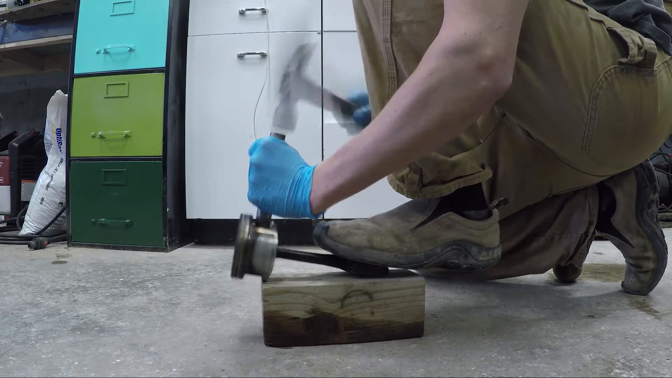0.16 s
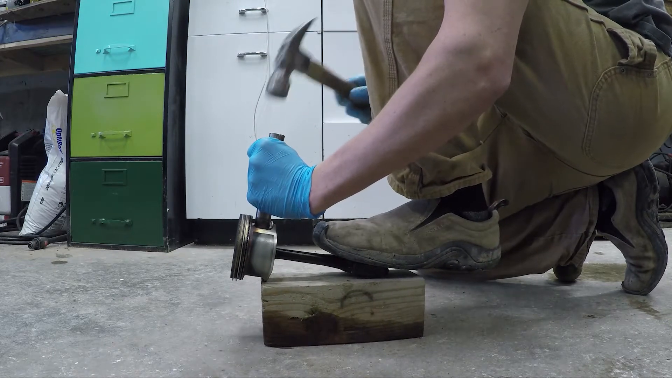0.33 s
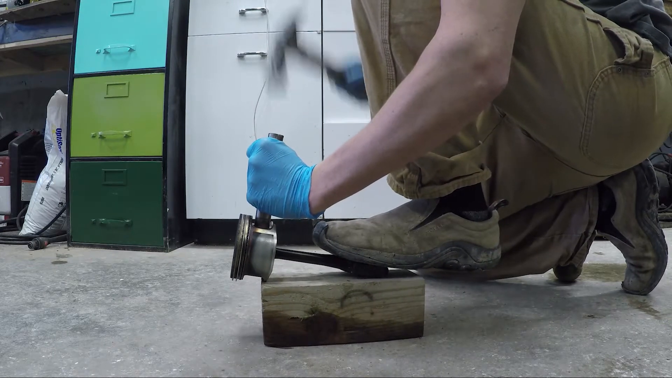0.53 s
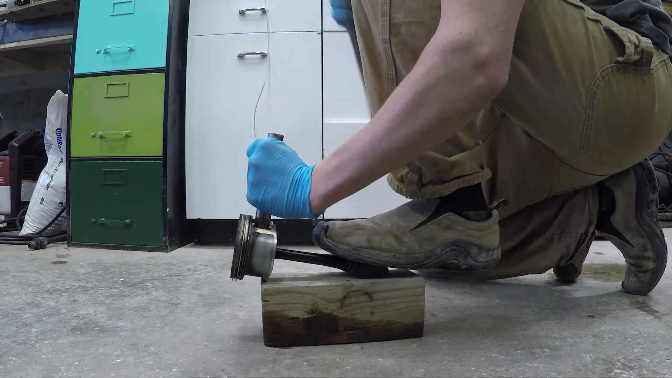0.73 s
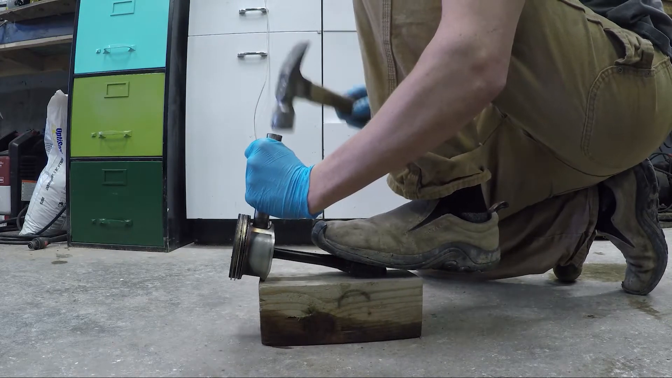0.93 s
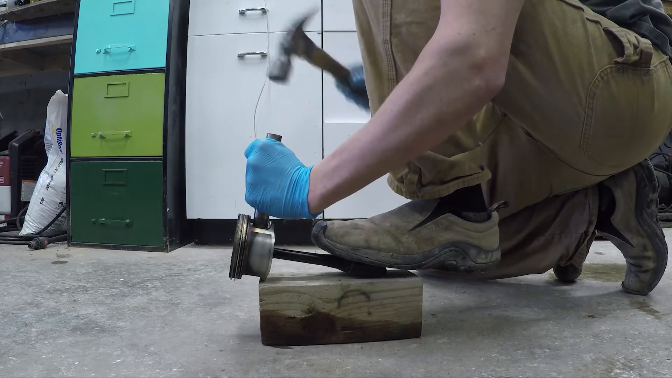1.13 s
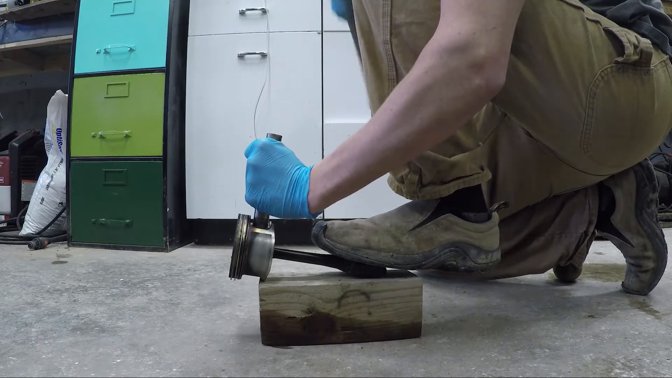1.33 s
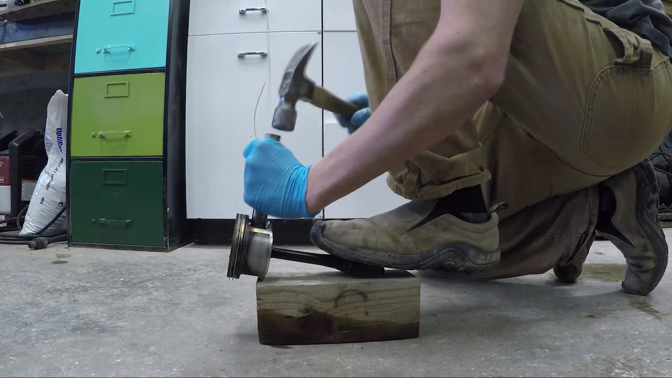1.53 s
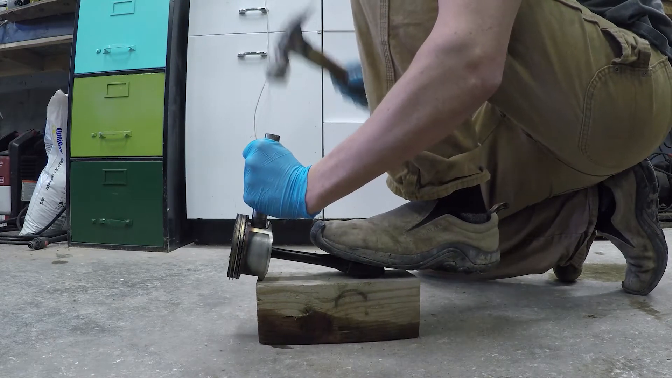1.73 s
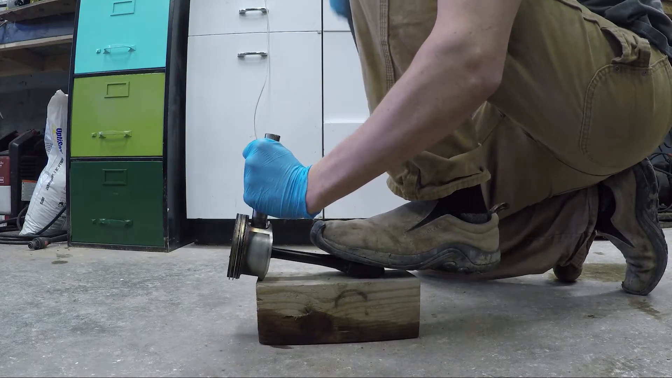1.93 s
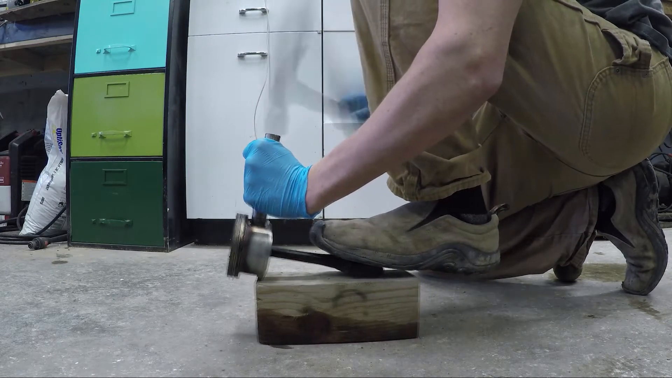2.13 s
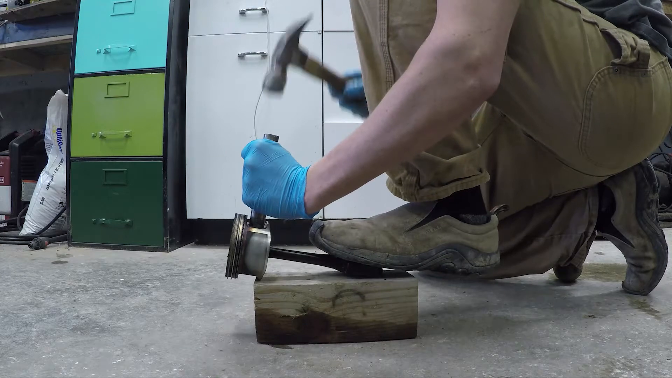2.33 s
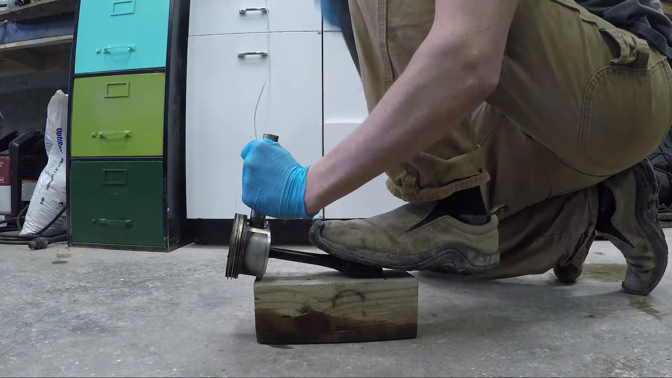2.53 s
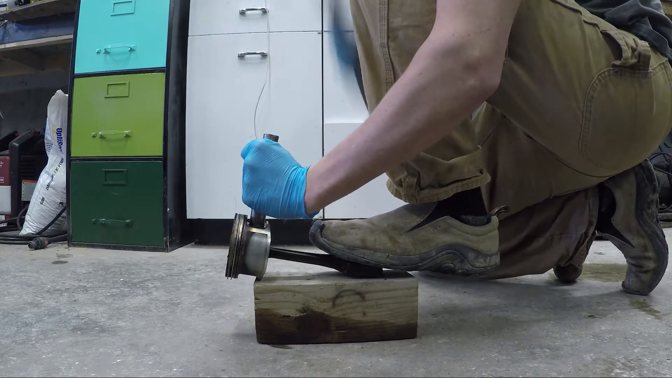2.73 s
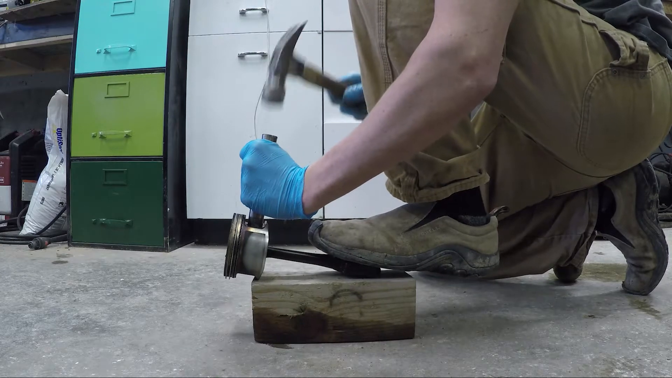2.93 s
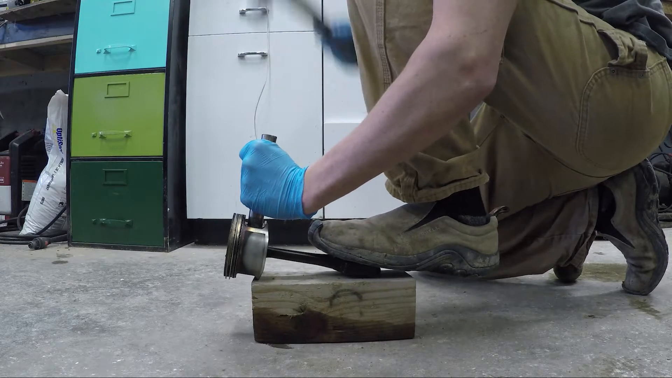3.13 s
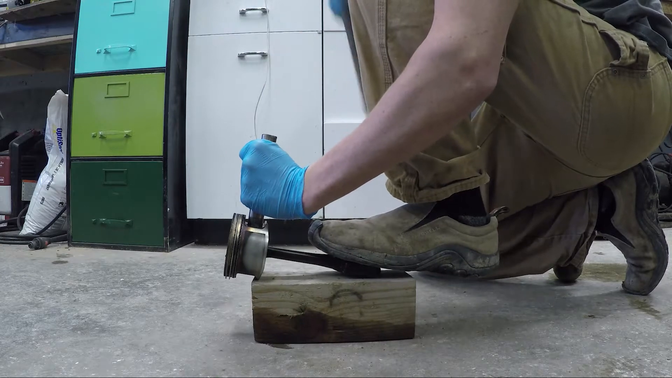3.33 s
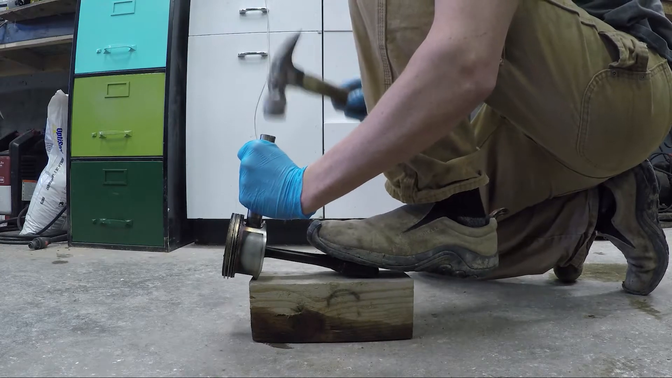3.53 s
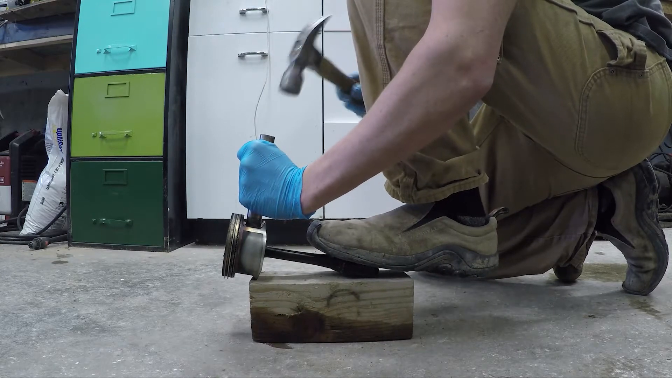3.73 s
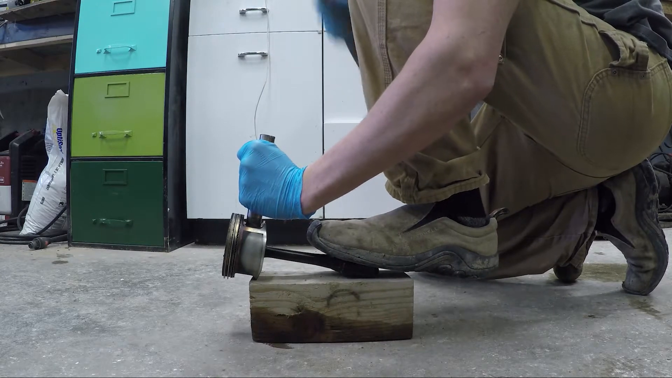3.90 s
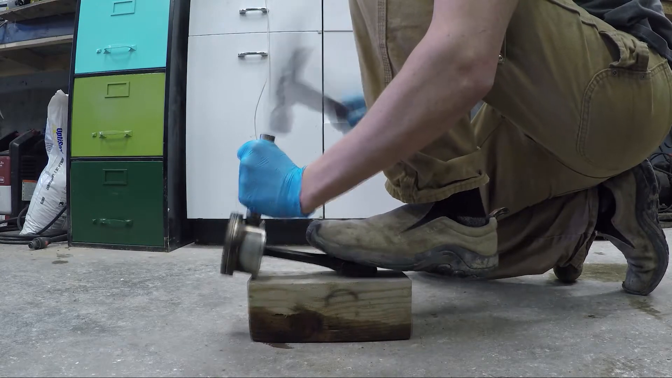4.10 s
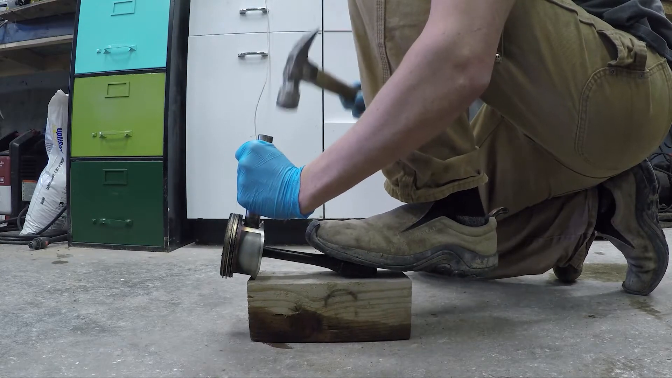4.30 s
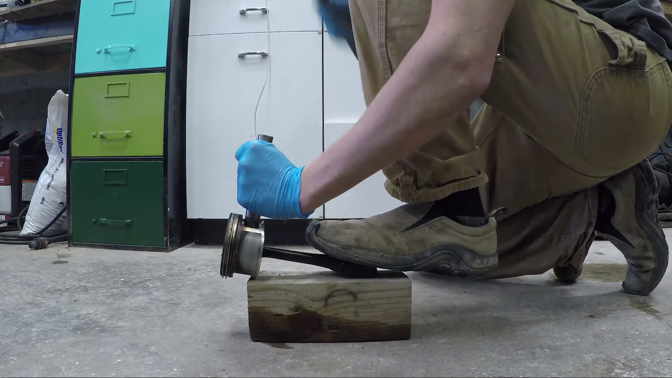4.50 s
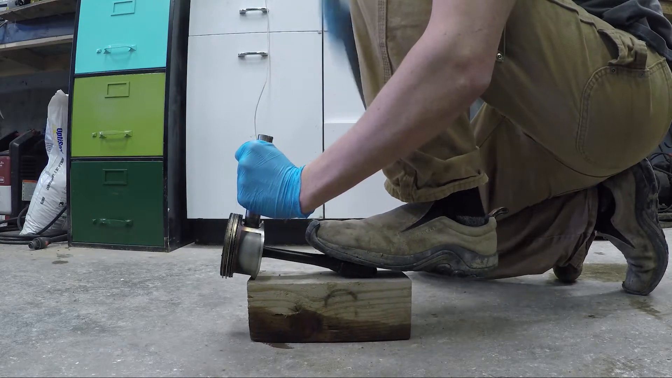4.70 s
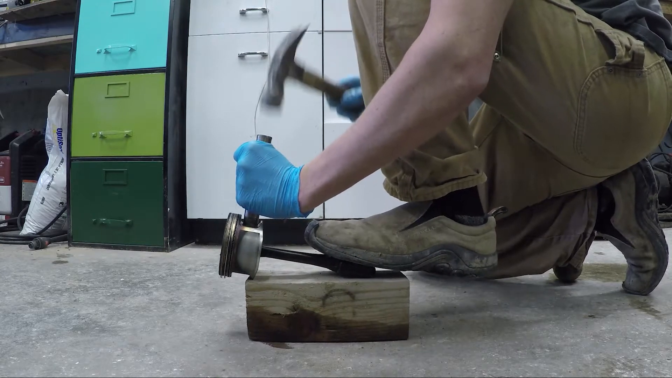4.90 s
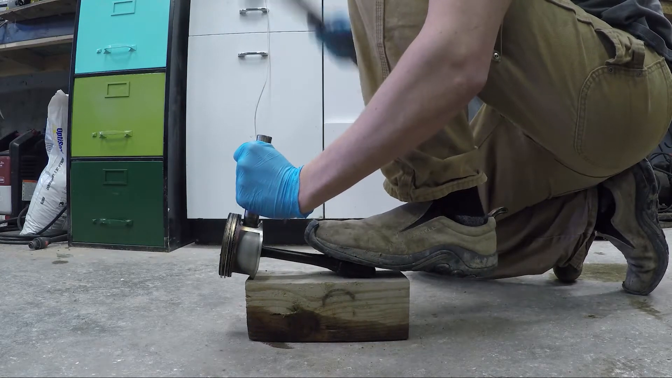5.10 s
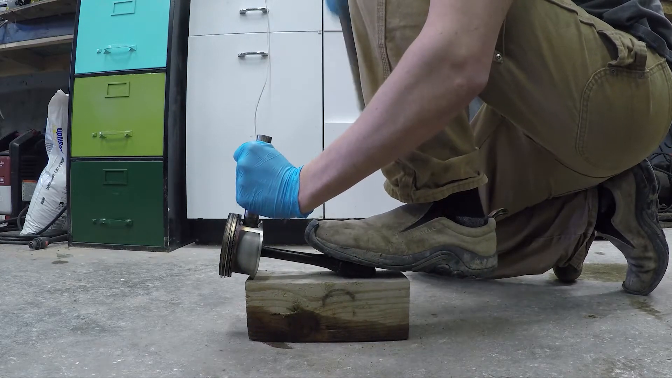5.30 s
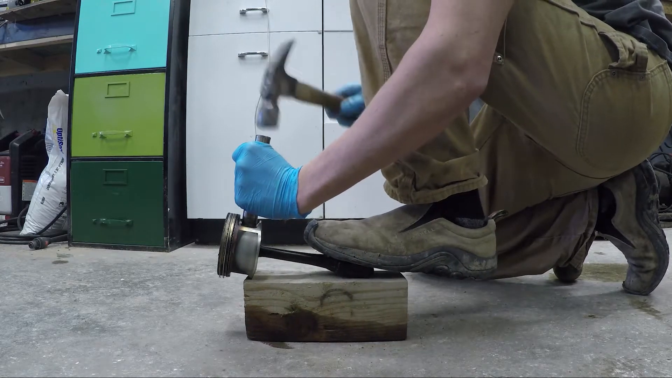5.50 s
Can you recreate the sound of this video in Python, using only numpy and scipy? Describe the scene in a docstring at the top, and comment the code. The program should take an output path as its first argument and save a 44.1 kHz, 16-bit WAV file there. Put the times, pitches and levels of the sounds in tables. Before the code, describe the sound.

A hammer strikes a steel punch in nine evenly paced blows, each a sharp clank and thump ringing briefly in a workshop.

```python
"""A workshop rings from a blow just struck; then come nine evenly paced hammer blows, steel on steel.
The hammer drives a punch into the pin of a piston that lies on a wood block on a concrete floor.
Each blow is a crack, a short clank and a deep thump; the room and its steel cabinets ring on.
The piston's ring changes colour as the pin travels. The close microphone overloads on each crack."""
import sys
import numpy as np
from scipy import signal
from scipy.fft import rfft, irfft, next_fast_len
from scipy.io import wavfile
from scipy.ndimage import uniform_filter1d

SR = 44100
rng = np.random.default_rng(int(sys.argv[2]) if len(sys.argv) > 2 else 0)


def put_to_file(sound):
    """Save the sound as 16-bit audio at rate SR, in the file named by the first command-line argument."""
    columns = np.atleast_2d(sound).T  # one column per channel
    safe = np.clip(columns, -1, 1)
    whole_steps = np.round(safe * 32767)
    wavfile.write(sys.argv[1], SR, whole_steps.astype(np.int16))


N = 244931
TAIL = np.arange(int(1.3 * SR)) / SR   # seconds since a hit

# decay time of the workshop's reverb: f/Hz, t60/s
ROOM_DECAY = [(60, 0.72), (160, 1.51), (450, 1.16), (1200, 1.193), (2200, 0.88), (4000, 0.88), (6500, 0.6),
              (9000, 0.43), (15000, 0.16)]


def from_db(db):
    """Decibels to gain."""
    return 10 ** (np.asarray(db) / 20)


def unit_rms(x):
    """Scale to unit power."""
    return x / np.sqrt(np.mean(x ** 2) + 1e-20)


def at_hz(curve, hz):
    """Read a curve on a log-frequency axis."""
    freqs, values = np.transpose(curve)
    return np.interp(np.log(np.maximum(hz, 1)), np.log(freqs), values)


def add(out, start_s, sound):
    """Mix a sound in; a negative start leaves only its tail."""
    at = round(start_s * SR)
    part = sound[max(-at, 0):N - at]
    out[max(at, 0):max(at, 0) + len(part)] += part


def attack(rise_s):
    """Envelope that rises from 0 towards 1."""
    return 1 - np.exp(-TAIL / rise_s)


def decay(t60):
    """Envelope that falls 60 dB in t60 seconds."""
    return from_db(-60 * np.minimum(TAIL / t60, 5))


def noise(spectrum, size):
    """Coloured noise of unit power."""
    n = next_fast_len(size)
    colour = from_db(at_hz(spectrum, np.fft.rfftfreq(n, 1 / SR)))
    return unit_rms(irfft(rfft(rng.standard_normal(n)) * colour, n)[:size])


def band(low_hz, high_hz, x):
    """Band-pass with unity gain at its centre."""
    sos = signal.butter(2, [low_hz, min(high_hz, .45 * SR)], "band", fs=SR, output="sos")
    return signal.sosfilt(sos, x)


def ringing(modes):
    """One decaying sine per mode, as rows."""
    return np.array([from_db(db) * np.sin(2 * np.pi * hz * TAIL) * decay(t60) for hz, db, t60 in modes])


def room_tone(level_db=-54):
    """The faint, steady rumble of the workshop."""
    # spectrum of the rumble: f/Hz, level/dB
    rumble = [(25, 3.5), (50, 9.5), (130, 6.5), (300, -14), (600, -21), (1200, -23), (3000, -36.5),
              (8000, -38.5), (15000, -40)]
    return from_db(level_db) * noise(rumble, N)


def reflections():
    """Diffuse echoes as third-octave noise bands, each dying at its own rate: centres and waveforms."""
    # colour of the reverb: f/Hz, level/dB
    colour = [(40, 5), (80, 8.5), (125, 6.5), (200, 0.5), (310, -2), (410, -10.5), (520, -1), (900, -1),
              (1400, 3.5), (2100, -0.5), (3600, 0), (6400, -5), (7800, -14), (11000, -14), (15000, -15.5)]
    edges = np.geomspace(28, 17000, 29)
    centres = np.sqrt(edges[1:] * edges[:-1])
    white = rng.standard_normal((2, len(TAIL)))
    bands = []
    for k, hz in enumerate(centres):
        wash = band(edges[k], edges[k + 1], white[k % 2])
        bands.append(wash * from_db(at_hz(colour, hz)) * decay(at_hz(ROOM_DECAY, hz)))
    return centres, np.array(bands)


def reverb(fixed_paths, bass_db=0, tilt_db=0, level_db=-15, alike=0.58, bass_hz=400, pivot_hz=2500):
    """The reverb of one hit: partly the same every time, partly new as the tools shift."""
    hz, fresh_paths = reflections()
    paths = np.sqrt(alike) * fixed_paths + np.sqrt(1 - alike) * fresh_paths
    low_shelf = bass_db / (1 + (hz / bass_hz) ** 2)
    treble_tilt = tilt_db * np.log2(np.maximum(hz / pivot_hz, 1))
    return from_db(level_db + low_shelf + treble_tilt) @ paths * attack(0.0067)


def workshop_ring(level_db=-1, spread_db=2.5):
    """A blow sets the room and its steel cabinets ringing, in a new balance each time."""
    # standing waves and cabinet panels: f/Hz, level/dB, t60/s
    modes = [(101.3, -33, 0.5), (111.6, -29, 0.69), (131.8, -36.5, 0.46), (160.5, -33.5, 0.72),
             (192, -32, 1), (285.4, -33.5, .6), (773, -40.5, 1.2), (890, -48, 1.8), (1115, -35.5, 0.75),
             (1177, -42, .9), (1213, -37, 0.98), (1253, -35, 1.4), (1424, -39.5, 0.88)]
    gains = from_db(level_db + spread_db * rng.standard_normal(len(modes)))
    return gains @ ringing(modes) * attack(0.0025)


def piston_ring(travel, level_db=2.5, spread_db=1.5, close_db=10):
    """Partials set by the pin's travel: briefly close, then lingering in the room as wavering bands."""
    # piston partials: f/Hz, width/Hz, level/dB at the start of the travel, level/dB at its end
    partials = [(871, 75, -37, -43.5), (1164, 150, -46.5, -35), (1323, 170, -35, -30),
                (1590, 410, -28.5, -44), (2423, 100, -42, -32.5), (2548, 120, -37.5, -36),
                (3310, 460, -43.5, -30.5), (4004, 410, -27, -44), (5130, 130, -30, -33),
                (5560, 270, -39.5, -40.5), (6080, 97, -34.5, -50.5), (6530, 130, -43.5, -32),
                (6710, 470, -45.5, -30), (8980, 220, -58, -38.5), (9480, 240, -42, -39)]
    close = from_db(close_db) * decay(0.035)
    out = 0
    for hz, width, start_db, end_db in partials:
        db = start_db + (end_db - start_db) * travel + spread_db * rng.standard_normal()
        tone = unit_rms(band(hz - width / 2, hz + width / 2, rng.standard_normal(len(TAIL))))
        lingering = decay(0.99 * at_hz(ROOM_DECAY, hz))
        out = out + from_db(level_db + db) * (close + lingering) * tone
    return out


def block_knock():
    """The hollow knock of the wood block, whose mass takes a moment to get going."""
    # modes of the block: f/Hz, level/dB, t60/s
    modes = [(111, -16.5, 0.15), (158.4, -26.5, 0.4), (194, -26.5, 0.17), (262.6, -14, 0.13),
             (291.8, -25, 0.15), (497, -30.5, 0.2)]
    return ringing(modes).sum(axis=0) * attack(0.0025)


def low_thump(lag_s=0.0046, width_s=0.0011, low_hz=30, level_db=4):
    """A deep thump under the crack: one low pulse, then a slow swing back."""
    pulse = np.exp(-.5 * ((TAIL - lag_s) / width_s) ** 2)
    return from_db(level_db) * signal.sosfilt(signal.butter(2, low_hz, "high", fs=SR, output="sos"), pulse)


def steel_hit(tick_db=4, crack_db=3.5, scatter_db=-21, spread_db=2):
    """Steel meets steel: a contact tick, a crack, a clank that varies, and scatter from things nearby."""
    # short, bright resonances of the clank: f/Hz, level/dB, t60/s
    modes = [(1126.5, -18, 0.059), (1244, -11, 0.043), (1521, -5, 0.027), (1920, -6, 0.032),
             (2075, -9, 0.023), (2432, -4.5, 0.036), (2588, -3, 0.044), (3120, -13.5, 0.055),
             (3427, -7.5, .045), (3650, -18, 0.099), (3790, -17.5, 0.044), (4438, -10.5, 0.037),
             (4738, -7, 0.016), (4980, -10, 0.012), (5140, -15.5, 0.042), (5100, -18.5, 0.015),
             (6620, -16, 0.055), (6810, -7, 0.022), (7300, -17, 0.016), (8770, -16, 0.038),
             (9270, -20.5, 0.053)]
    # spectrum of the crack: f/Hz, level/dB
    crack_colour = [(100, -17), (400, -5), (800, -4), (1300, -2.5), (2500, -2), (5000, 1.5), (6800, -3),
                    (7800, -13), (10000, -15), (15000, -19)]
    polarity = (-1) ** np.arange(len(modes))
    clank = (polarity * from_db(spread_db * rng.standard_normal(len(modes)))) @ ringing(modes)
    crack_and_scatter = from_db(crack_db) * decay(0.021) + from_db(scatter_db) * decay(0.29)
    burst = noise(crack_colour, len(TAIL)) * crack_and_scatter
    tick = from_db(tick_db) * decay(0.004) * unit_rms(band(3000, 5000, rng.standard_normal(len(TAIL))))
    return tick + (clank + burst) * attack(0.0005)


def hammering(touch_room_db=-3):
    """Every blow and light touch, with the room's answer."""
    # hammer blows, the first already dying away: t/s, hit level/dB, thump level/dB, room level/dB,
    # reverb bass/dB, reverb tilt/(dB per octave), pin travel/(0 to 1)
    blows = [(-0.47, -5, -4, -1, -1, 2, 0.15), (0.2056, 0, -2, -0.63, 4, 2.5, 0),
             (0.8886, 2, -2, 0.2, 3.5, 1, .4), (1.5497, 1, -3.5, 1.24, 2.5, 0.9, .5),
             (2.1839, 1.5, -4.5, -1.6, 1.5, 1, 0.65), (2.8214, -0.5, -16, -1.3, 1.5, 1.5, 0.72),
             (3.4823, 0, -15.5, -0.5, 1, 1, 0.8), (4.143, 0, -8, -0.9, 1.5, 1.2, 0.99),
             (4.8102, -0.5, -26, -3, 0.5, 1.5, 0.95), (5.4519, -0.5, -27.5, -0.8, 0, 1.5, 0.85)]
    # light touches of steel on steel: t/s, level/dB
    touches = [(0.695, -59.5), (0.944, -18), (1.905, -57)]
    out = np.zeros(N)
    _, fixed_paths = reflections()
    knock = block_knock()
    for start_s, hit_db, thump_db, room_db, bass_db, tilt_db, travel in blows:
        room = workshop_ring() + reverb(fixed_paths, bass_db, tilt_db) + piston_ring(travel)
        direct = from_db(hit_db) * (steel_hit() + knock) + from_db(thump_db) * low_thump()
        add(out, start_s, direct + from_db(room_db) * room)
    for start_s, db in touches:
        add(out, start_s, from_db(db) * (steel_hit() + from_db(touch_room_db) * reverb(fixed_paths)))
    return out


def suppress_hiss(x, above_hz=1900, threshold_db=-50, slope=0.44, depth_db=4):
    """A noise suppressor turns the treble down once it has become faint."""
    treble = signal.sosfiltfilt(signal.butter(2, above_hz, "high", fs=SR, output="sos"), x)
    level_db = 10 * np.log10(np.abs(uniform_filter1d(treble ** 2, size=900)) + 1e-12)
    gain = from_db(np.clip(slope * (level_db - threshold_db), -depth_db, 0))
    return x + treble * (gain - 1)


def scene():
    """The hammering over a bed of room tone, in mono."""
    return (hammering() + room_tone())[None]


def record(dry, hardness=2.27, cutoff_hz=15400):
    """The microphone soft-clips on each crack; faint hiss is suppressed; the top end is cut steeply."""
    clipped = dry / (1 + np.abs(dry) ** hardness) ** (1 / hardness)
    return signal.sosfiltfilt(signal.butter(20, cutoff_hz, fs=SR, output="sos"), suppress_hiss(clipped))


dry = scene()
out = record(dry)
put_to_file(out)
```